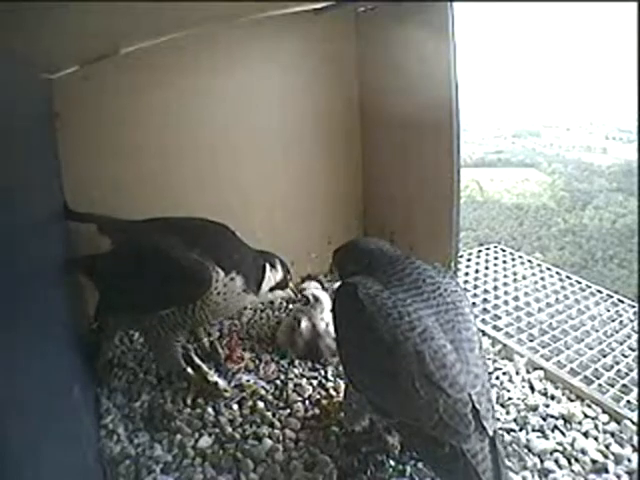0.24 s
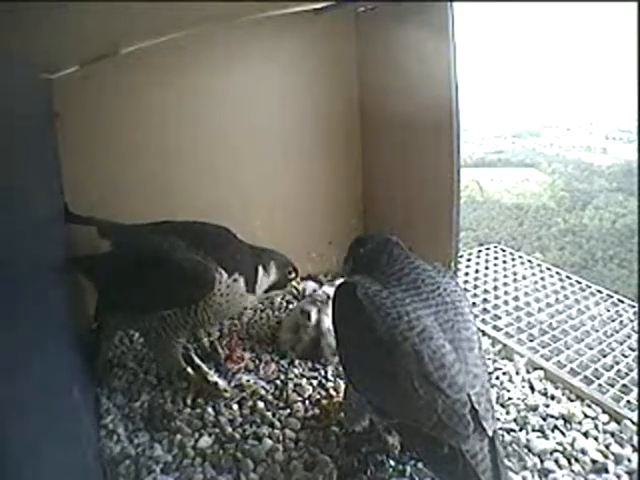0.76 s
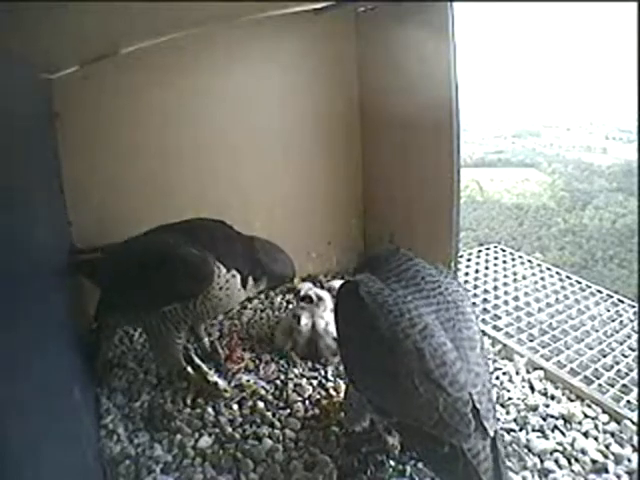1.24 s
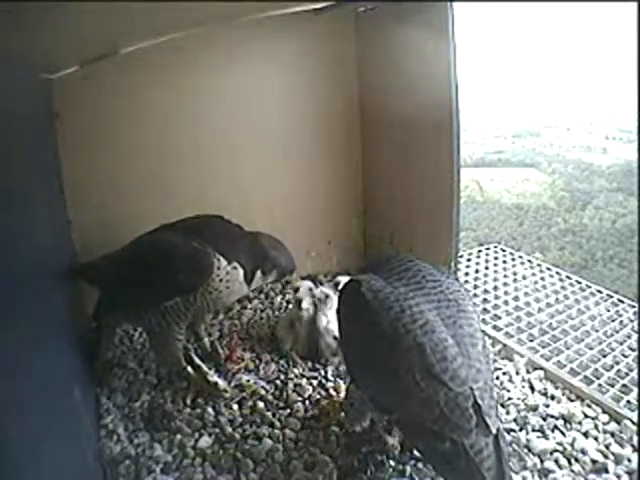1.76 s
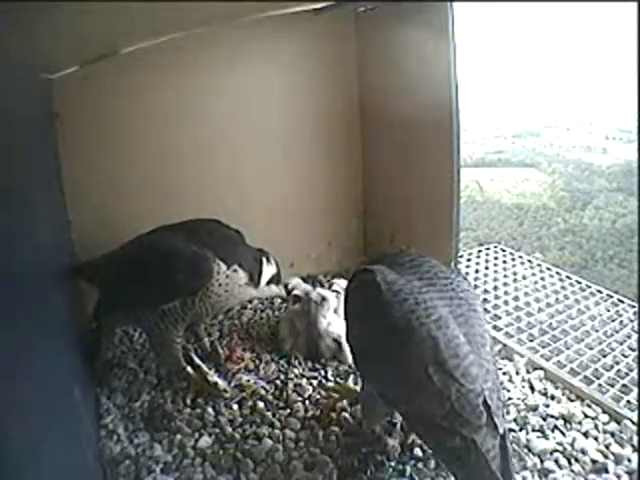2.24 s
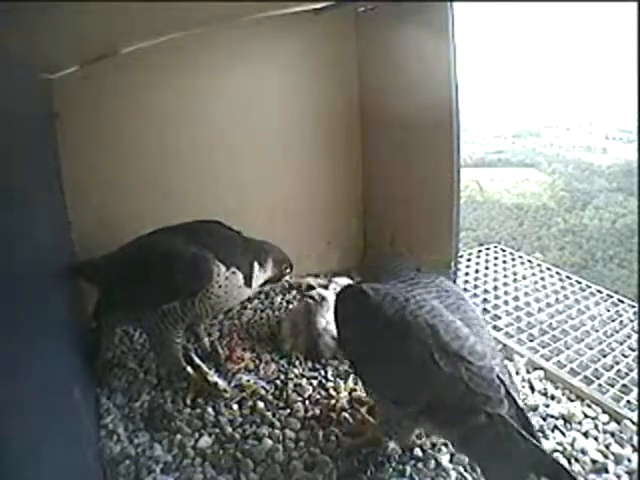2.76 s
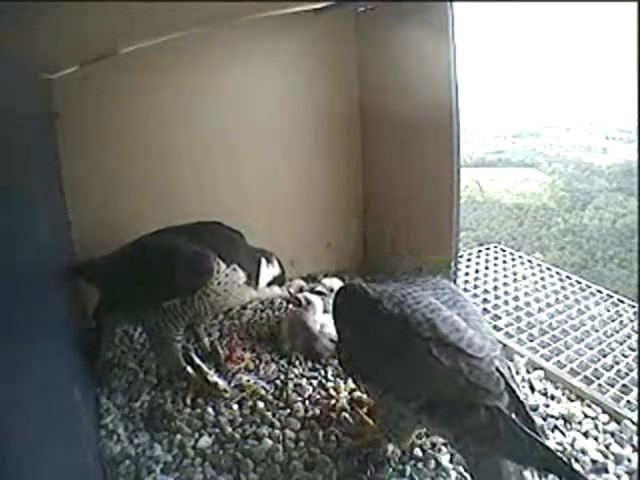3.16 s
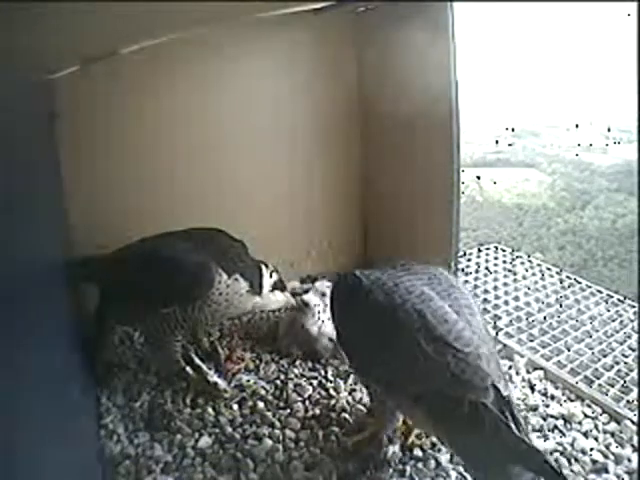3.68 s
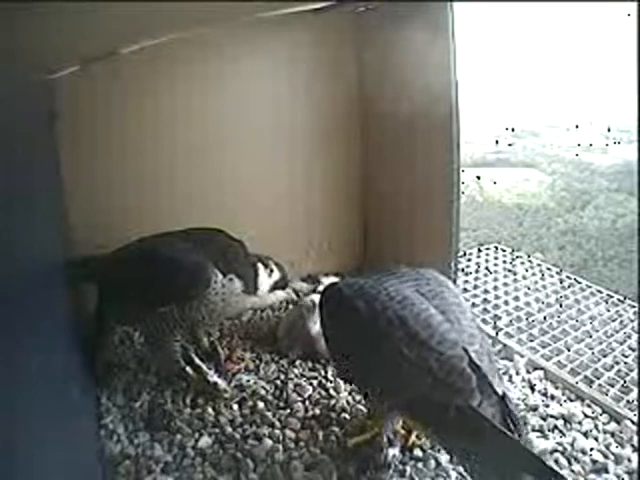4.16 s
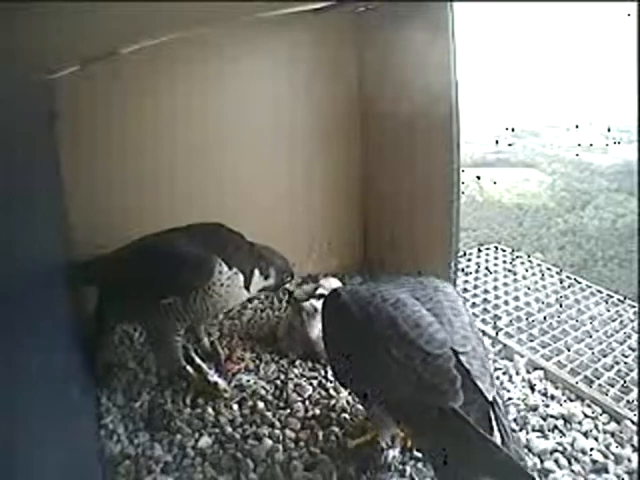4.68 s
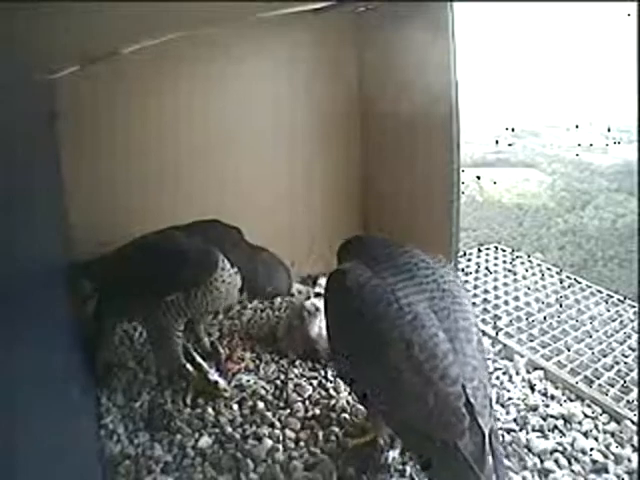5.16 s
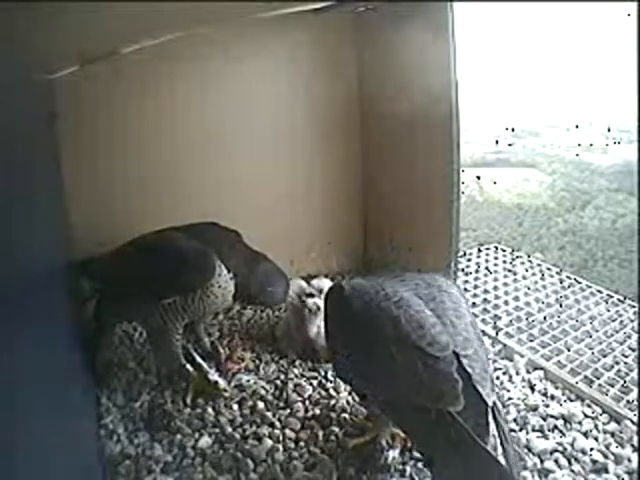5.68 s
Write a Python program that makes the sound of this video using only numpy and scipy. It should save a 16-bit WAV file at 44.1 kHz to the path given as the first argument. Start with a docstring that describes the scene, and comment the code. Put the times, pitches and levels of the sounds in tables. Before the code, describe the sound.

Faint rumble and rustling open the scene, then a falcon's sharp call bursts out close by. Quiet, high, quavering chick whines follow and build into an overlapping chorus. Three more calls come around the middle and another later, the loudest slightly overloaded with a bright edge. The boxy wooden space rings briefly; low hum and thin hiss continue underneath.

```python
"""Falcons feeding in a nest box

Falcons feed their chicks in a wooden nest box, close to a small camera microphone. An adult gives five loud
"ee-chup" calls, each a gliding harmonic whistle joined to a falling rasp of pulses. Chicks whine in thin
overlapping arcs of wavering harmonics, and the box rings briefly after each call. Filtered noise makes soft
swells, some around the calls, ticking gravel and distant rumble; wavering sines make a low hum."""
import sys
import numpy as np
from scipy import signal
from scipy.fft import rfft, irfft
from scipy.io import wavfile
from scipy.ndimage import uniform_filter1d

SR = 44100
rng = np.random.default_rng(int(sys.argv[2]) if len(sys.argv) > 2 else 0)


def wav_out(sig):
    """Save sig, one row per channel (or a flat mono array), as 16-bit PCM at SR to the path in sys.argv[1]."""
    wavfile.write(sys.argv[1], SR, np.round(np.clip(np.atleast_2d(sig).T, -1, 1) * 32767).astype(np.int16))


N = 261072
T = np.arange(N) / SR  # time [s]


def undb(db):
    """Decibels to gain."""
    return 10 ** (np.asarray(db) / 20)


def unit(x):
    """Scale to rms 1."""
    return x / np.sqrt(np.mean(x ** 2) + 1e-18)


def walk(rate, size=N):
    """Smooth chance with a spread near 1, turning about rate times a second."""
    step = max(int(SR / rate), 2)
    held = np.repeat(rng.standard_normal(size // step + 1), step)
    smooth = uniform_filter1d(uniform_filter1d(held, step), step)
    return 1.3 * smooth[:size]


def noise(colour, size=N):
    """Noise of rms 1, shaped by a spectrum of (frequency [Hz], level [dB]) points."""
    points_hz, points_db = np.transpose(colour)
    hz = np.maximum(np.fft.rfftfreq(size, 1 / SR), 1)
    curve_db = np.interp(np.log(hz), np.log(points_hz), points_db)
    spectrum = rfft(rng.standard_normal(size)) * undb(curve_db)
    return unit(irfft(spectrum, size))


def ring(x, modes):
    """Drive parallel resonances given as (frequency [Hz], width [Hz], level [dB])."""
    return sum(undb(db) * signal.lfilter(*signal.iirpeak(hz, hz / width, fs=SR), x)
               for hz, width, db in modes)


def butter(x, hz, kind, order=2):
    """High-pass, low-pass or band-pass."""
    return signal.sosfilt(signal.butter(order, hz, kind, fs=SR, output="sos"), x)


def perform(notes, shape, voice, attack_s, release_s):
    """Shape each note and sing it through a voice, with an attack and a release after its length."""
    out = np.zeros(N)
    for start, length, *traits in notes:
        on = (T > start) & (T < start + length + release_s)
        t = T[on] - start
        attack = np.minimum(t / attack_s, 1)
        release = np.minimum((length + release_s - t) / release_s, 1)
        out[on] += (attack * release) ** 2 * voice(*shape(t, length, *traits))
    return out


def whistle_shape(t, length, crest_s, start_hz, crest_hz, end_hz, db, second_db, third_db,
                  throb_hz, depth_db, wobble=.004):
    """Pitch bends by way of a crest where level peaks; the fundamental throbs, both ends are hoarse."""
    swell_db, fade_db = 9.5, 16.5  # start and end lie this far under the crest, throb aside
    opening_db = 6  # overtones gain this much as the beak opens on the way to the crest
    before = np.clip(1 - t / crest_s, 0, 1)
    after = np.clip((t - crest_s) / (length - crest_s), 0, 1)
    hz = crest_hz + (start_hz - crest_hz) * before ** 2 + (end_hz - crest_hz) * after ** 1.2
    throb_db = depth_db * np.cos(2 * np.pi * throb_hz * (t - crest_s))
    level_db = db - swell_db * before ** 2 - fade_db * after ** 1.4 + throb_db
    dull_db = opening_db * before + throb_db  # takes the throb back out of the overtones
    hoarse = .022 * (before ** 2 + after) * walk(700, len(t))
    unsteady_hz = hz * (1 + wobble * walk(220, len(t)) + hoarse)
    return unsteady_hz, level_db, second_db - dull_db, third_db - dull_db


def whistle(hz, db, second_db, third_db, jitter=0.00083, flutter_db=1.7, rolloff_db=-7, rough=0.12,
            overtone_flutter_db=3.5):
    """One side of the syrinx sings a nearly clean tone with three overtones, hoarse when blown softly."""
    size = len(hz)
    shake = jitter + np.interp(db, [-44, -26], [.025, 0])
    phase = 2 * np.pi * np.cumsum(hz * (1 + shake * walk(900, size))) / SR
    tone = np.sin(phase)
    for k, overtone_db in enumerate([second_db, third_db, third_db + rolloff_db], 2):
        tone = tone + undb(overtone_db + overtone_flutter_db * walk(400, size)) * np.sin(k * phase)
    level = undb(db + flutter_db * walk(300, size))
    return np.sqrt(2) * level * tone * (1 + rough * walk(3000, size))


# The adult's whistles: (start [s], length [s], time to the crest [s], start pitch [Hz], crest pitch [Hz],
# end pitch [Hz], relative level [dB], second harmonic [dB], third harmonic [dB], throb [Hz], throb depth [dB])
ADULT_WHISTLES = [ (0.611, 0.057, 0.026, 2417, 2549, 2328, -12, -6, -10, 148, 3),
                  (2.189, .068, 0.036, 2128, 2500, 2398, -13.5, -2.5, -3.5, 49.7, 4),
                  (2.231, 0.039, 0.025, 3330, 3202, 3205, -17, -12, -23.5, 60.4, 2.5),
                  (2.619, 0.034, .017, 3540, 3597, 3452, -9.5, -8.5, -24, 100, 0.5),
                  (2.998, 0.044, .016, 2000, 2007, 1910, -40.5, 6, 5.5, 90.6, 4),
                  (3.031, 0.032, .016, 3700, 3280, 3270, -13, -8.5, -20.5, 110, 5),
                  (3.036, 0.045, .016, 2760, 2367, 1940, -18.5, -6, -6, 65.5, 4),
                  (4.279, 0.021, 0.0093, 3460, 3533, 3664, -16.5, -20, -40.5, 90, 2),
                  (4.285, 0.045, .030, 2612, 2607, 2610, -10.5, -3, -17, 70.3, 1.5), ]


def adult_whistles():
    """The "ee" of each call: brief tones, some of them overlapping."""
    return perform(ADULT_WHISTLES, whistle_shape, whistle, attack_s=0.0095, release_s=0.0045)


# How the rasp changes with its rate, weakening as it slackens; the fundamental booms at both ends:
# (pulse rate [Hz], throat level [dB], fundamental level [dB])
RASP_RATE_RESPONSE = [(215, -10, -5), (243, -8, -9), (342, 3.5, -12), (480, 2, -15), (628, 5, -0.5),
                      (710.5, 4.5, -7.5)]


def rasp_shape(t, length, start_hz, end_hz, db, edge_db, ring_db):
    """The pulse rate slides in an S-curve; loudness and body follow the rate."""
    slide = (1 - np.cos(np.pi * np.clip(t / length, 0, 1))) / 2
    hz = start_hz * (end_hz / start_hz) ** slide
    rates, throat, fundamental = np.transpose(RASP_RATE_RESPONSE)
    throat_db = np.interp(hz, rates, throat)
    body_db = np.interp(hz, rates, fundamental) - throat_db
    return hz, db + throat_db, body_db, edge_db, ring_db


def scatter(x):
    """Quick bounces between bird and wall blunt sharp pulses without colouring them: all-pass echoes."""
    for lag in (11, 23, 37, 59):  # samples
        a = np.r_[1, np.zeros(lag - 1), .6]
        x = signal.lfilter(a[::-1], a, x)
    return x


# Resonances of throat and box that colour the rasp: (frequency [Hz], width [Hz], level [dB])
RASP_RESONANCES = [(222, 20, -8.5), (354.9, 58, -10.5), (652, 40, -10.5), (1130, 200, -18.5),
                   (1585, 60, -15), (2640, 260, -1.5), (3170, 300, -6), (3420, 230, -17), (5000, 310, -18),
                   (5450, 130, -16), (6900, 280, -25.5), (7150, 910, -27.5), (7750, 250, -28),
                   (9600, 820, -25.5)]


def rasp(hz, db, body_db, edge_db, ring_db, jitter=.03, scatter_db=8.5, gas=.02):
    """Slack membranes slap unevenly; pulses and puffs of air ring throat and box over a round fundamental."""
    size = len(hz)
    cycles = np.cumsum(hz * (1 + jitter * walk(500, size))) / SR
    pulses = np.diff(np.floor(cycles), prepend=-1) * undb(scatter_db * walk(600, size))
    puffs = gas * np.exp(-(cycles % 1) / 0.88) * rng.standard_normal(size)
    drive = pulses + puffs
    modes = RASP_RESONANCES + [(1891, 26, ring_db)]  # a sharp throat resonance joins the rest
    parts = []
    for lo, hi in ((170, 900), (900, 2250), (2250, 10800)):
        rung = ring(drive, [mode for mode in modes if lo < mode[0] <= hi])
        part = butter(rung, [lo, hi], "band", order=5)
        # the effort, not the meeting of a harmonic with a resonance, sets the loudness
        power = np.abs(uniform_filter1d(part ** 2, size=400))
        parts.append(part / np.sqrt(power + 1e-12))
    low, throat, edge = parts
    body = 1.3 * np.sin(2 * np.pi * cycles) + .4 * low
    return undb(db) * (undb(body_db) * body + scatter(throat + undb(edge_db) * edge))


# The adult's rasps, rising into a whistle or falling out of it: (start [s], length [s],
# start pulse rate [Hz], end pulse rate [Hz], relative level [dB], bright edge [dB], throat ring [dB])
ADULT_RASPS = [ (0.659, 0.055, 652, 219.7, -27, -1.5, -9.5), (2.246, .054, 642.8, 215.3, -29.5, 2.5, -2.5),
               (2.591, .036, 284.9, 686, -20, -9.5, 1), (2.646, 0.051, 548.8, 218.8, -24.5, -6.5, 2),
               (3.063, .040, 570, 217.8, -34.5, 0, -3), (4.257, .027, 269.7, 620, -25, -7, -3),
               (4.322, 0.051, 655, 224.1, -32, -0.5, -5.5), ]


def adult_rasps():
    """The falling "chup" of each call, and rising rasps that lead into two of them."""
    return perform(ADULT_RASPS, rasp_shape, rasp, attack_s=.009, release_s=0.015)


# Soft thumps under the loudest whistles: (centre [s], width between 1/e points [s], peak level [dB])
CALL_THUMPS = [(0.647, 0.0015, -24.5), (2.225, 0.003, -35), (2.634, 0.009, -19.5), (3.054, 0.0045, -42.5),
               (4.308, 0.007, -26)]


def thumps():
    """Each is one smooth low bump, as the loudest whistles overload the microphone."""
    return sum(undb(db) * np.exp(-(2 * (T - s) / width) ** 2) for s, width, db in CALL_THUMPS)


def whine_shape(t, length, start_hz, held_hz, end_hz, scoop_s, db, overtones_db, drift=0.0037,
                swell_db=1.1):
    """A whine scoops towards its held pitch, quavers and swells, and bends away at the end."""
    sag_s = 0.082  # time scale of the closing bend, as the chick runs out of air
    crescendo_db = 3  # growth from start to end
    strain_db_per_octave = 5.5  # louder where bent below the held pitch
    lift_hz, lift_width_hz, lift_peak_db = 1945, 120, 8.5  # the box lifts the fundamental around here
    t = np.clip(t, 0, length)
    scoop = (1 + t / scoop_s) ** -2
    sag = (1 + (length - t) / sag_s) ** -2
    bend = (1 + (start_hz / held_hz - 1) * scoop) * (1 + (end_hz / held_hz - 1) * sag)
    quaver = (.004 + .07 * np.abs(1 - bend)) * walk(110, len(t))
    hz = held_hz * bend * (1 + drift * walk(6.7, len(t)) + quaver)
    lift_db = lift_peak_db * np.exp(-((hz - lift_hz) / lift_width_hz) ** 2)
    swell = swell_db * walk(7.2, len(t))
    effort_db = crescendo_db * (t / length - .5) + swell - strain_db_per_octave * np.log2(bend)
    return hz, db + lift_db + effort_db, overtones_db - lift_db


def whine(hz, db, overtones_db, jitter=0.0018, waver=0.004, flutter_db=3.5, breath=0.084, gain_db=-2):
    """A chick's thin, unsteady voice of five harmonics; it turns hoarse and broken at low pitch."""
    size = len(hz)
    hoarse = np.interp(hz, [1500, 1950], [1, 0])
    shake = jitter + .018 * hoarse
    unsteady_hz = hz * (1 + shake * walk(700, size) + waver * walk(49, size))
    phase = 2 * np.pi * np.cumsum(unsteady_hz) / SR
    harmonics_db = [0, overtones_db - 4.5, overtones_db - 10.0, overtones_db - 9.5, overtones_db - 11.5]
    tone = np.zeros(size)
    # each harmonic flutters on its own and carries a skirt of air
    for k, harmonic_db in enumerate(harmonics_db, 1):
        airy = 1 + breath * walk(760, size)
        tone += undb(harmonic_db + flutter_db * walk(45, size)) * np.sin(k * phase) * airy
    broken = undb(hoarse * (5 * walk(130, size) - 4))
    return np.sqrt(2) * undb(db + gain_db) * broken * tone


# The chicks' whines: (start [s], length [s], start pitch [Hz], held pitch [Hz], end pitch [Hz],
# scoop time [s], relative level [dB], overtones [dB])
CHICK_WHINES = [ (0.77, 0.15, 2020, 1903, 2075, 0.047, -70.5, 0),
                (0.93, .17, 2200, 2340, 2345, 0.12, -84, -7),
                (1.145, .09, 1557, 2288, 2150, 0.045, -60, -4),
                (1.22, 0.99, 2066, 2070, 1405, 0.037, -68, -2),
                (1.25, 0.35, 2320, 2480, 2530, 0.38, -66, 1.5),
                (1.515, 0.073, 1100, 1940, 1800, 0.045, -58, 1), (1.58, 0.6, 1812, 2137, 2030, 0.1, -69, 8),
                (1.65, 0.12, 2284, 2470, 2520, 0.071, -60, 0),
                (1.76, 0.54, 2530, 2350, 2330, 0.11, -64, -11),
                (1.66, 0.23, 2620, 2840, 2550, .06, -66, -5), (2.36, .23, 2174, 1990, 1905, 0.11, -62, 4.5),
                (2.90, 0.085, 1450, 2130, 2130, 0.066, -63.5, 9),
                (3.13, 0.074, 1716, 1905, 1270, 0.039, -68.5, 3.5),
                (3.25, .405, 1990, 2140, 1320, 0.076, -63.5, 6.5),
                (3.55, .70, 2307, 2563, 2590, 0.37, -69.5, -1),
                (3.97, 0.302, 1166, 2077, 2125, 0.027, -64.5, -2),
                (4.42, 0.51, 2169, 2204, 1220, 0.063, -67.5, 10),
                (4.55, .36, 2433, 2617, 2520, .08, -70, -5), (4.78, .145, 2100, 2146, 1274, 0.059, -65, 4),
                (4.94, 0.2, 1928, 1942, 1905, 0.044, -70, -6), (5.23, .21, 2070, 2234, 2113, 0.071, -77, 4),
                (5.455, 0.1026, 1505, 2030, 1927, 0.026, -67, -10.5),
                (5.52, 0.45, 2043, 2116, 2020, 0.076, -69, 8),
                (5.62, .29, 2230, 2380, 2620, 0.098, -72.5, 1), ]


def chick_whines():
    """The chicks that stand out, in overlapping arcs."""
    return perform(CHICK_WHINES, whine_shape, whine, attack_s=0.0076, release_s=0.014)


# The rest of the brood whimpering together: (time [s], relative level [dB])
BROOD_LEVEL = [(0.0, -75), (1.25, -57), (1.73, -53), (2.39, -52.5), (3.25, -64.5), (3.51, -50.5),
               (3.64, -67.5), (4.88, -63), (5.16, -71.5), (5.92, -53.5)]
# The hoarse part of the chicks' voices: (frequency [Hz], relative density [dB per Hz])
BROOD_AIR = [(1300, -30), (2000, -4), (2700, 1), (3200, -13), (4100, -2), (4700, -4.5), (5600, -6.5),
             (6400, -15.5), (7100, -4.5), (8200, 0), (9000, -18.5), (10400, -6), (11200, -24)]


def brood(hz=2130, spread=.045, hiss_db=-4, count=3):
    """The other chicks whimper hoarsely around one pitch, each drifting and swelling on its own."""
    voices = sum(whine(hz * (1 + spread * walk(3.0)), 4 * walk(15), np.zeros(N)) for _ in range(count))
    air = undb(hiss_db + 2 * walk(29)) * noise(BROOD_AIR)
    level_db = np.interp(T, *np.transpose(BROOD_LEVEL))
    return undb(level_db) * (unit(voices) + air) / 2


# Standing waves that ring on in the box: (frequency [Hz], width [Hz], level [dB])
BOX_RESONANCES = [(238, 18, -5), (646, 45, -18), (1610, 53, -15.5), (1795, 41, -10), (2640, 23, -25),
                  (3122, 20, -26.5)]


def box(x, wet_db, t60, damp_hz=8000):
    """Close walls give a short dense tail, decaying 60 dB in t60 seconds, and a few standing waves."""
    t = T[:SR // 4]
    build_up = np.minimum(t / .004, 1)
    decay = np.exp(-np.log(1000) * t / t60)
    tail = butter(rng.standard_normal(len(t)), damp_hz, "low") * decay * build_up
    tail /= np.sqrt(np.sum(tail ** 2))
    return x + undb(wet_db) * signal.fftconvolve(x, tail)[:N] + ring(x, BOX_RESONANCES)


# Soft noise swells, some around the calls: (centre [s], width between 1/e points [s], relative level [dB])
NOISE_SWELLS = [(0.006, 0.13, -59), (0.208, 0.15, -64), (0.408, 0.21, -62.5), (0.596, 0.13, -49.5),
                (1.03, 0.23, -62), (2.087, 0.6, -58.5), (2.907, 0.15, -63), (3.45, 0.14, -59.5),
                (4.051, 0.14, -59), (4.815, 0.17, -60.5), (5.029, 0.094, -64)]
# Beaks and gravel: (time [s], relative peak level [dB])
GRAVEL_TICKS = [(0.409, -42.5), (1.1627, -47.5), (2.0884, -51), (5.0769, -47), (5.1873, -50)]
# Spectrum of swells and ticks: (frequency [Hz], relative density [dB per Hz])
SWELL_SPECTRUM = [(300, -43), (1500, -10), (2700, -4), (4000, -3.5), (4700, -11.5), (5600, -9),
                  (7400, -1.5), (8700, -5.5), (10200, 1), (11500, -2.5), (14000, -35)]


def nest(tick_s=0.017, tick_db=-9, grain_db=2.0):
    """Soft grainy swells of noise come and go; beaks and pebbles tick and die away."""
    swells = sum(undb(db) * np.exp(-(2 * (T - s) / width) ** 2) for s, width, db in NOISE_SWELLS)
    ticks = sum(undb(db + tick_db) * (T >= s) * np.exp(-np.abs(T - s) / tick_s) for s, db in GRAVEL_TICKS)
    grain = undb(grain_db * walk(220) + 0.5)
    return noise(SWELL_SPECTRUM) * (swells * grain + ticks)


# Distant rumble: (time [s], level [dB])
RUMBLE_LEVEL = [(0.0, -46), (0.51, -46.5), (0.77, -51.5), (1.53, -49), (2.04, -47), (3.15, -58), (4.3, -53),
                (4.47, -57.5), (5.92, -54)]
# Spectrum of the outside air: (frequency [Hz], relative density [dB per Hz])
AIR_SPECTRUM = [(20, 4), (50, -3), (100, -1), (125, -7.5), (205, 3), (255, 0), (310, -9.5), (520, -16.5),
                (670, -6.5), (820, -22.5), (1150, -13.5), (1500, -29), (2000, -23.5), (3000, -36.5)]


def rumble(flicker_db=1.85, gust_db=-49, gust_s=0.69):
    """Rumble from outside booms in the box, flickering in level, as a deeper gust dies away."""
    level_db = np.interp(T, *np.transpose(RUMBLE_LEVEL)) + flicker_db * walk(12.0)
    boom = undb(level_db) * butter(noise(AIR_SPECTRUM), 4300, "low")
    gust_noise = noise([(20, -2.5), (60, -0.5), (200, -18.0), (1000, -64)])
    return boom + undb(gust_db) * np.exp(-T / gust_s) * gust_noise


# Low hum: (frequency [Hz], level before flutter [dB])
HUM_TONES = [(99, -71), (206, -70.5), (251, -74)]


def hum(waver=0.011, flutter_db=6.5):
    """A few low sines, each wavering in pitch and level."""
    out = np.zeros(N)
    for hz, db in HUM_TONES:
        phase = 2 * np.pi * np.cumsum(hz * (1 + waver * walk(19))) / SR
        out += undb(db + flutter_db * walk(13.0)) * np.sin(phase)
    return np.sqrt(2) * out


# Spectrum of the thin hiss: (frequency [Hz], relative density [dB per Hz])
HISS_SPECTRUM = [(500, -14), (2300, 3), (3200, -2.5), (4200, -4.5), (5000, -5), (7500, -4.5), (9000, -5.5),
                 (10400, 4.5), (11500, -8), (13000, -35)]


def hiss(level_db=-72):
    """A thin, steady hiss of shaped noise."""
    return undb(level_db) * noise(HISS_SPECTRUM)


def scene():
    """The adult is near the microphone; the chicks lie deeper, so the walls carry more of them."""
    whistles = box(adult_whistles(), wet_db=-19.0, t60=0.17, damp_hz=10900)
    rasps = box(adult_rasps(), wet_db=-13.0, t60=0.2, damp_hz=10900)
    chicks = undb(-0.5) * box(chick_whines() + brood(), wet_db=-5.5, t60=.12, damp_hz=10700)
    nest_sounds = box(nest(), wet_db=-6, t60=.06)
    mix = whistles + rasps + thumps() + chicks + nest_sounds + rumble() + hum() + hiss()
    return mix[None]


def record(dry, limit=0.52):
    """The dull microphone overloads on the whistles, which gives them a bright edge; the top is cut."""
    dull = butter(dry, 10900, "low", order=14)
    fine = signal.resample_poly(dull, 4, 1, axis=-1)  # oversampled to limit aliases from the overload
    squashed = fine / (1 + (fine / limit) ** 8) ** (1 / 8)
    overloaded = signal.resample_poly(squashed, 1, 4, axis=-1)
    no_subsonics = butter(overloaded, 26, "high", order=1)
    top_cut = signal.ellip(8, .2, 70, 14700, fs=SR, output="sos")
    return signal.sosfilt(top_cut, no_subsonics)


dry = scene()
out = record(dry)
wav_out(out)
```